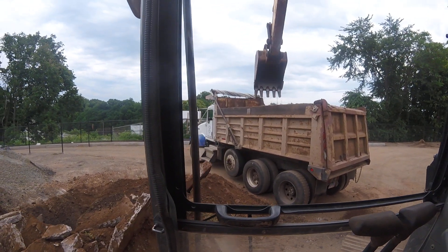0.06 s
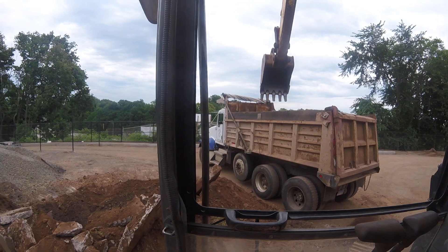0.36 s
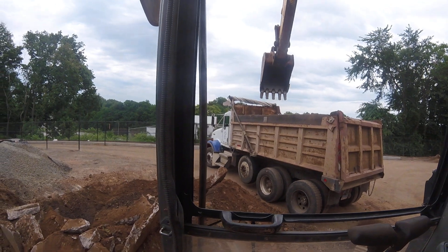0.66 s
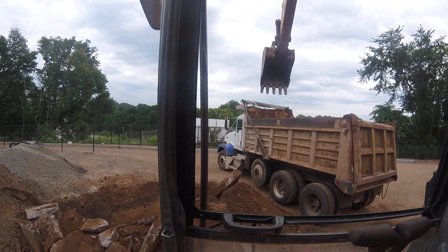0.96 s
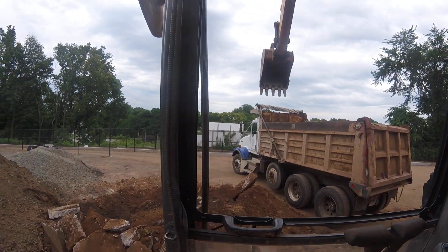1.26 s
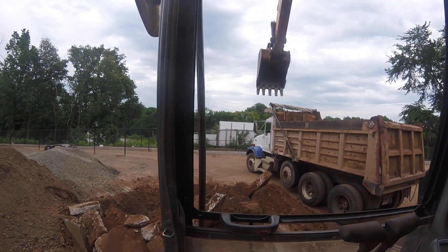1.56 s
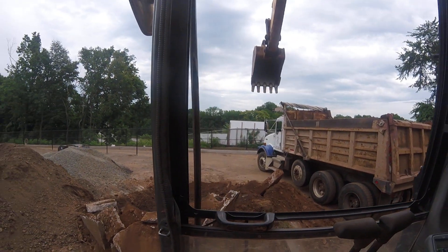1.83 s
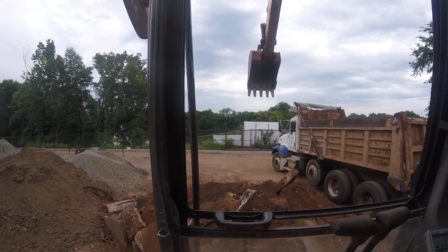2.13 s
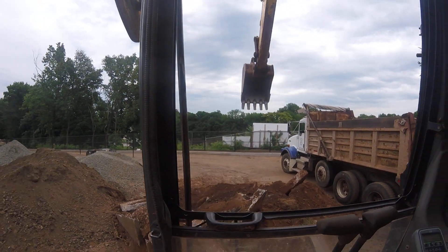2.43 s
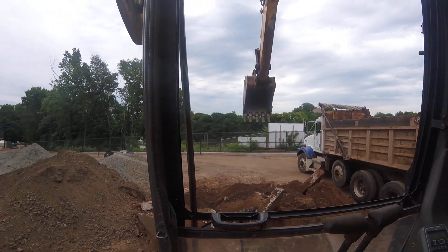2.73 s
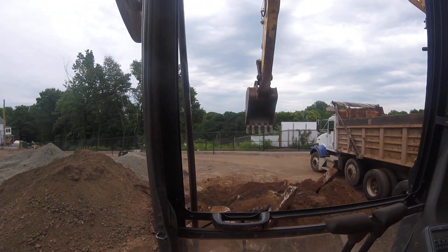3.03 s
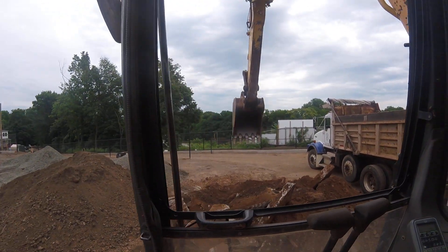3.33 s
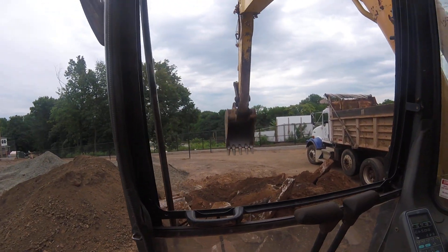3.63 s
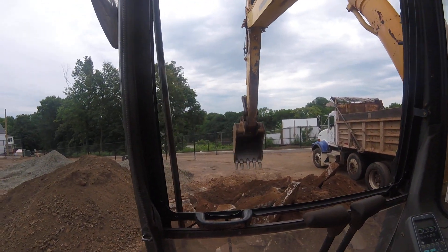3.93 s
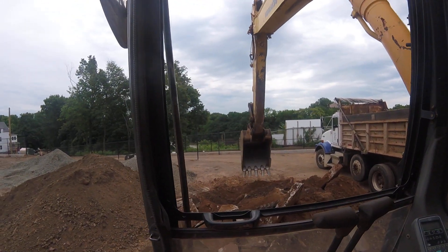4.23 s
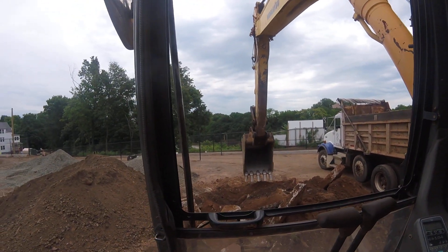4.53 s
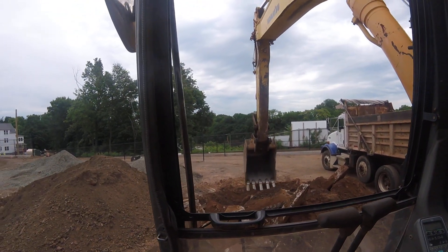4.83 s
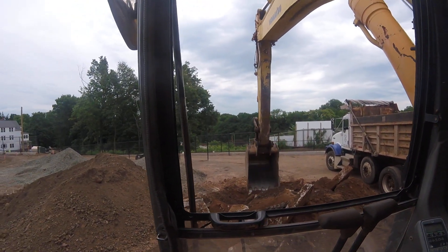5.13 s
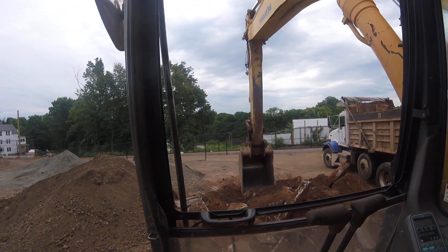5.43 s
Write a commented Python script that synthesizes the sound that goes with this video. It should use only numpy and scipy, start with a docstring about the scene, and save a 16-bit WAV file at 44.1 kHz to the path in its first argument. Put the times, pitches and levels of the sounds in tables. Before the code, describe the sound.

Inside an excavator's cab, a diesel engine drones over a low rumble, with a faint hydraulic whine and hiss. About half a second in, a hard jolt rattles the cab and the engine dips in pitch. A loose fitting knocks irregularly close by, and the drone ducks and swells back after the loudest hits. Near the end the engine sags again as the trim clatters.

```python
"""A diesel engine drones, heard inside an excavator's cab as the machine swings and lowers its boom.
Periodic firing gives a harmonic series whose pitch sags under load; the hydraulic pump's piston
strokes whine, and turbulent oil hisses. The cab shakes, trim rattles, jolts excite the body's modes,
and a loose fitting knocks close by. Each hard knock drives a limiter down, and the drone swells back
over the next second."""
import sys
import numpy as np
from scipy import signal
from scipy.fft import rfft, irfft, next_fast_len
from scipy.io import wavfile
from scipy.ndimage import uniform_filter1d, minimum_filter1d

SR = 44100
rng = np.random.default_rng(int(sys.argv[2]) if len(sys.argv) > 2 else 0)


def int16_out(signal):
    """Quantize to a 16-bit WAV file."""
    q = np.round(np.clip(np.atleast_2d(signal).T, -1, 1) * 32767)
    wavfile.write(sys.argv[1], SR, q.astype(np.int16))


N = 250488
TIME = np.arange(N) / SR

# engine speed, sagging as the pump loads it: (t/s, firing rate f/Hz)
FIRING_RATE = [(0.0, 125.9), (0.47, 125.2), (0.68, 118.3), (1.12, 117.8), (1.36, 122.7), (2.17, 125.8),
               (2.72, 126.7), (2.86, 127), (4.27, 127.3), (4.65, 124.1), (4.87, 119.7), (5.6, 120.4),
               (5.68, 121.4)]
# weaker engine harmonics: (multiple of crank speed, level/dB)
ENGINE_ORDERS = [(2, -27.5), (4, -36.5), (5, -45), (6, -38), (7, -41.5), (8, -41), (12, -46), (18, -44.5),
                 (24, -47.5)]
# air resonances of the cab, lifting a harmonic that passes through: (f/Hz, bandwidth/Hz, gain/dB)
CAB_AIR_MODES = [(78.1, 4.5, 9.5), (243.9, 5.2, 11.5), (341.4, 4.3, 8.5), (469, 9.8, 16), (972, 46, 10.5)]
# the engine's mechanical roar: (f/Hz, relative spectral level/dB)
ROAR_SPECTRUM = [(60, 0), (110, 4), (160, -2), (240, -3), (320, -8.5), (420, -12.5), (640, -12.5),
                 (820, -11), (1050, -9), (1450, -14), (1800, -26), (2300, -51), (3500, -76)]
# spans with the boom valve held open: (start t/s, end t/s, whine level/dB)
VALVE_OPENINGS = [(-.1, 0.757, -34.5), (4.69, 5.7, -32)]
# the pump's whine: (multiple of the piston rate, relative level/dB)
PUMP_HARMONICS = [(1, 0.5), (2, -9.5), (3, -11.5), (4, -9), (5, -16)]
# hiss of flowing oil: (f/Hz, relative spectral level/dB)
HISS_SPECTRUM = [(900, -15), (2000, -0.5), (2500, -0.8), (3000, -10.5), (3500, -3.5), (4200, -3),
                 (4800, -13.5), (7100, -16.5), (7900, -24.5), (10000, -24), (12400, -21), (13500, -54)]
# oil whistling in valves and hoses: (f/Hz, bandwidth/Hz, relative level/dB)
OIL_RESONANCES = [(2500, 9.9, -17.5), (2824, 110, -3.5), (2987, 14, -9), (4070, 47, -7), (4860, 26, -20),
                  (6100, 63, -23.5), (7030, 86, -17.5)]
# the cab shaking on its mounts: (f/Hz, relative spectral level/dB)
SHAKE_SPECTRUM = [(7, -52), (16, -17), (24, 9), (33, 8.5), (45, 8), (60, 4.5), (80, -10), (105, 6.5),
                  (140, -14), (220, -87)]
# lurches that swell the shaking: (crest t/s, gain/dB)
LURCH_SWELLS = [(.98, -1), (1.63, 8.5), (2.25, 3.5), (2.55, 1.5), (2.95, 3.5), (3.65, 5), (3.92, 5.5),
                (4.8, 2), (5.62, 10)]
# trim and windows rattling in their frames: (t/s, level/dB, rise/s, T60/s, tilt/(dB per octave))
RATTLE_BURSTS = [(0.271, -31.5, 0.0058, 0.28, 0.5), (0.321, -28, 0.0021, 0.45, 1),
                 (.408, -32, 0.0042, 0.63, 2.5), (.565, -22, 0.0083, 0.16, 3.5),
                 (.609, -11, 0.0032, 0.2, -5), (.722, -36.5, 0.0056, 0.079, 1),
                 (.817, -35, 0.0023, 0.024, 6), (4.882, -32, 0.0033, 0.062, -4),
                 (4.915, -23.5, .008, 0.24, -3.5), (5.310, -15.5, 0.0052, 0.048, 0.5),
                 (5.320, -8, 0.0058, 0.13, -4.5), (5.377, -21, 0.0091, 0.11, -3),
                 (5.548, -15, 0.018, 0.21, -4), (5.592, -20.5, 0.0065, 0.2, -4.5),
                 (5.624, -19.5, 0.0044, 0.031, -0.5)]
# clatter of their contacts: (f/Hz, relative spectral level/dB)
RATTLE_SPECTRUM = [(150, -3.5), (300, -4.5), (800, -3.5), (1500, 7), (2000, -9.5), (3000, -2), (4200, -7),
                   (5000, -13.5), (7000, -19), (8500, -26.5), (11500, -34), (14000, -71)]
# panel modes that a rattle excites: (f/Hz, bandwidth/Hz, relative level/dB)
PANEL_MODES = [(383, 64, -2), (814, 7.2, 17), (864, 15, 5), (1480, 40, -23), (2650, 83, -14),
               (3900, 126, 4), (6000, 140, -22)]
# jolts through the machine: (t/s, peak level/dB, most strongly driven f/Hz)
JOLT_BLOWS = [(.324, -7.5, 720), (.612, 4.5, 212), (.614, -17, 4200), (5.316, -23, 800),
              (5.322, -24.5, 1490), (5.345, -20, 840), (5.545, -13, 274), (5.562, -14, 356),
              (5.596, -16, 250), (5.626, -17.5, 878)]
# modes of the cab's body: (f/Hz, relative level/dB, T60/s)
BODY_MODES = [(193, 4, 0.094), (262.4, -8.5, 0.35), (343, -4.5, 0.21), (441, -7, 0.28), (549.5, -5, 0.22),
              (697, 1.5, 0.068), (810, -4, 0.12), (1044, -5.5, 0.044), (1536, -5, 0.026), (2780, -1, .025),
              (4140, -13.5, 0.093)]
# knocks of the loose fitting: (t/s, peak level/dB)
FITTING_KNOCKS = [(0.5636, 5.8), (0.903, 13.2), (0.9265, -9.0), (1.2917, -10.3), (1.5899, -9.0),
                  (1.6717, 8.6), (2.0268, -8.2), (2.0979, -15), (2.2632, -12.5), (2.302, -11.5),
                  (2.3366, -14.5), (2.6317, 10.5), (2.6793, -9.0), (3.5057, -11.0), (3.6142, -9.3),
                  (3.6907, 8.6), (3.727, -6.5), (3.849, -6.9), (3.8842, -9.0), (4.0521, 12.9),
                  (4.1508, 1.4), (4.2123, -1.1), (4.2729, -7.0), (4.5155, -14.5), (4.5546, -11.0),
                  (4.7334, -12.3), (4.7675, -5.8), (4.7991, -8.5), (4.8836, -2.6), (5.3745, -5.0),
                  (5.6675, 6.5)]
# its modes, the main one first: (f/Hz, relative level/dB, T60/s)
FITTING_MODES = [(1302, 5, 0.014), (1060, -15, 0.0082), (1563, -7, 0.0092), (2260, -49, 0.026),
                 (2760, -31.5, 0.031), (3430, -17.5, 0.013), (3796, -23, 0.016), (6400, -21, 0.0094)]
# the gritty crack of its contact: (f/Hz, relative spectral level/dB)
CRACK_SPECTRUM = [(400, -28), (900, -6), (1700, 2.5), (2400, -18.5), (4200, 3.5), (5500, -7.5),
                  (7000, -1.5), (8500, -19.5), (13000, -1.5)]

FIRINGS_PER_TURN, STROKES_PER_TURN = 3, 6.75   # engine firings and pump strokes per crank turn
NO_LOAD_FIRING_HZ = 127.3


def from_db(db):
    """Amplitude ratio of a level in decibels."""
    return 10 ** (np.asarray(db) / 20)


def unit_rms(x):
    """Normalise to rms 1."""
    return x / np.sqrt(np.mean(x ** 2) + 1e-20)


def drift(rate_hz):
    """Low-pass filtered noise: a smooth random wander of rms about 1."""
    pole = np.exp(-80 * np.pi * rate_hz / SR)
    noise = rng.standard_normal(N // 40 + 2002)   # one value per 40 samples
    slow = signal.lfilter([1], [1, -2 * pole, pole * pole], noise)[2000:]
    return np.interp(np.arange(N) / 40, np.arange(len(slow)), unit_rms(slow))


def coloured(x, spectrum, tilt_db=0):
    """Filter x by a spectral envelope, tilted in dB per octave; rms 1."""
    size = next_fast_len(len(x))
    octaves = np.log2(np.maximum(np.fft.rfftfreq(size, 1 / SR), 1))
    hz, db = np.transpose(spectrum)
    slope_db = tilt_db * np.clip(octaves, np.log2(hz[0]), np.log2(hz[-1]))
    gain = from_db(np.interp(octaves, np.log2(hz), db) + slope_db)
    return unit_rms(irfft(rfft(x, size) * gain, size)[:len(x)])


def resonate(x, modes):
    """Forced response of parallel resonators, each at its own relative level; rms 1."""
    out = 0
    for hz, width, db in modes:
        band = signal.lfilter(*signal.iirpeak(hz, hz / width, fs=SR), x + 1e-18)
        out += from_db(db) * unit_rms(band)
    return unit_rms(out)


def ring(t, hz, t60):
    """Free vibration of a damped mode, falling 60 dB in t60 seconds."""
    return np.sin(2 * np.pi * hz * t) * np.exp(-np.log(1000) * t / t60)


def tone(cycles, waver_db, waver_hz):
    """A sinusoid of rms 1, then given random amplitude modulation."""
    carrier = np.sqrt(2) * np.sin(2 * np.pi * (cycles + rng.random()))
    return carrier * from_db(waver_db * drift(waver_hz))


def lowpass(x, hz):
    """Second-order attenuation above hz."""
    return signal.sosfilt(signal.butter(2, hz, fs=SR, output="sos"), x)


def add(out, start_s, sound):
    """Superpose a sound on out from start_s."""
    at = int(np.clip(start_s * SR, 0, N - 1))
    out[at:at + len(sound)] += sound[:N - at]


def diesel(crank_hz, turns, sag_hz):
    """Periodic excitation: firing makes a harmonic drone and modulates the mechanical roar."""
    firings = FIRINGS_PER_TURN * turns
    firing_db = -19.5 + 0.35 * sag_hz   # grows as the engine labours
    drone = from_db(firing_db) * tone(firings, waver_db=1.36, waver_hz=24)   # uneven combustion throbs
    for order, db in ENGINE_ORDERS:
        lift_db = sum(gain_db / (1 + (2 * (order * crank_hz - hz) / width) ** 2)
                      for hz, width, gain_db in CAB_AIR_MODES)
        drone += from_db(db + lift_db) * tone(order * turns, waver_db=2.5, waver_hz=4.5)
    pulsing_db = 0.74 * np.sin(2 * np.pi * firings) + 0.54 * np.sin(np.pi * turns) + 0.22 * drift(24)
    roar = coloured(rng.standard_normal(N) * from_db(pulsing_db), ROAR_SPECTRUM)
    return drone + from_db(-22.5) * roar


def pump_whine(turns):
    """Pressure ripple: pistons geared to the crank sound harmonics, louder while the boom moves."""
    opening_s, closing_s = 0.15, 0.26
    effort = from_db(-42)   # idling
    for start, end, db in VALVE_OPENINGS:
        valve = np.clip(1 + np.minimum((TIME - start) / opening_s, (end - TIME) / closing_s), 0, 1)
        effort = np.maximum(effort, from_db(db) * valve)
    strokes = STROKES_PER_TURN * turns
    whine = sum(from_db(db) * tone(k * strokes, waver_db=3.5, waver_hz=4.4) for k, db in PUMP_HARMONICS)
    return effort * whine


def oil_flow(sag_hz):
    """Turbulence: oil hisses through valves and hoses and whistles at their resonances."""
    turbulence = rng.standard_normal(N) * from_db(0.42 * drift(30))
    hiss = from_db(-1.5) * coloured(turbulence, HISS_SPECTRUM)
    whistle = from_db(-7) * resonate(rng.standard_normal(N), OIL_RESONANCES)
    flow_db = -43 - 0.08 * sag_hz   # flow falls with the pump's speed
    return from_db(flow_db) * (hiss + whistle)


def cab_shaking():
    """Forced vibration: the cab rumbles evenly on its mounts and swells as the machine lurches."""
    lurch_s = 0.085   # time to swell, and to settle
    rumble = coloured(rng.standard_normal(N), SHAKE_SPECTRUM)
    even = rumble / np.sqrt(uniform_filter1d(rumble ** 2, size=4400) + 0.048)
    swell_db = sum(db * np.exp(-((TIME - crest) / lurch_s) ** 2) for crest, db in LURCH_SWELLS)
    return from_db(-21 + swell_db) * even


def trim_rattles():
    """Random impact excitation: bursts of dense contacts clatter, ring the panels and die away."""
    out, t = np.zeros(N), TIME[:SR // 3]
    contacts_per_s, lowest_hz = 2500, PANEL_MODES[0][0]
    for start, db, rise, t60, tilt_db in RATTLE_BURSTS:
        envelope = np.minimum(t / rise, 1) * np.exp(-np.log(1000) * np.maximum(t - rise, 0) / t60)
        contacts = envelope * rng.standard_normal(len(t)) * (rng.random(len(t)) < contacts_per_s / SR)
        panels = [(hz, width, mode_db + tilt_db * np.log2(hz / lowest_hz))
                  for hz, width, mode_db in PANEL_MODES]
        clatter = from_db(-3) * coloured(contacts, RATTLE_SPECTRUM, tilt_db)
        ringing = from_db(-9.5) * resonate(contacts, panels)
        add(out, start, from_db(db) * np.sqrt(np.mean(envelope ** 2)) * (clatter + ringing))
    return out


def body_jolts():
    """Modal superposition: a blow rings the body's modes, favouring those near its own pitch."""
    out, t = np.zeros(N), TIME[:SR // 4]
    attack_s = 0.00044
    for start, peak_db, pitch_hz in JOLT_BLOWS:
        blow = np.zeros(len(t))
        for k, (hz, db, t60) in enumerate(BODY_MODES):
            octaves_below = np.log2(pitch_hz / hz)
            coupling_db = -8.6 * abs(octaves_below) - 5.4 * max(octaves_below, 0)
            blow += (-1) ** k * from_db(db + coupling_db) * ring(t, hz, t60)
        blow *= 1 - np.exp(-t / attack_s)
        add(out, start, from_db(peak_db) * blow / np.abs(blow).max())
    return out


def loose_fitting():
    """Impact on heavily damped modes: hollow knocks, brighter when harder, each rebounding once."""
    out, t = np.zeros(N), TIME[:SR // 25]
    modes = np.array([from_db(db) * ring(t, hz, t60) for hz, db, t60 in FITTING_MODES])
    modes[1:] *= -1   # in antiphase to the main mode, so the ring takes a cycle to build
    faint_taps = [(when * N / SR, -20 + 6 * force) for when, force in rng.random((7, 2))]
    for start, peak_db in FITTING_KNOCKS + faint_taps:
        # each contact lands a little differently and favours other modes
        weights = from_db(2.6 * rng.standard_normal(len(modes)))
        weights[0] = 1
        grit = coloured(rng.standard_normal(len(t)), CRACK_SPECTRUM)
        crack = from_db(-14.5) * grit * np.exp(-t / 0.0014)
        cutoff_hz = np.clip(3000 * from_db(0.49 * peak_db), 1300, 8000)
        knock = lowpass(weights @ modes + crack, cutoff_hz)
        knock *= from_db(peak_db) / np.abs(knock).max()
        add(out, start, knock)
        rebound_s = 0.00307 + 0.00318 * rng.random()
        rebound = lowpass(knock, hz=1900) * from_db(-8.5 - 8.9 * rng.random())
        add(out, start + rebound_s, rebound)
    return out


def scene():
    """Superposition at the driver's seat; engine and pump follow the same crank rotation."""
    firing_hz = np.interp(TIME, *np.transpose(FIRING_RATE))
    crank_hz = firing_hz / FIRINGS_PER_TURN
    sag_hz = NO_LOAD_FIRING_HZ - firing_hz
    turns = np.cumsum(crank_hz * (1 + 0.0024 * drift(8.7))) / SR
    machine = diesel(crank_hz, turns, sag_hz) + pump_whine(turns) + oil_flow(sag_hz)
    cab = cab_shaking() + trim_rattles() + body_jolts() + loose_fitting()
    return (machine + cab)[None]


def record(dry):
    """Look-ahead limiting: gain drops at once on a peak and recovers slowly; a low-pass cuts the top."""
    ceiling, release_db_per_s, cutoff_hz = 0.69, 11.5, 13000
    over_db = 20 * np.log10(np.maximum(np.abs(dry[0]) / ceiling, 1))
    held_db = np.maximum.accumulate(over_db + release_db_per_s * TIME) - release_db_per_s * TIME
    gain_db = uniform_filter1d(minimum_filter1d(-held_db, size=89), size=89)
    fade_in = np.minimum(TIME / 0.005, 1)
    treble_cut = signal.ellip(8, 0.1, 70, cutoff_hz, fs=SR, output="sos")
    return signal.sosfilt(treble_cut, dry * from_db(gain_db) * fade_in)


dry = scene()
out = record(dry)
int16_out(out)
```